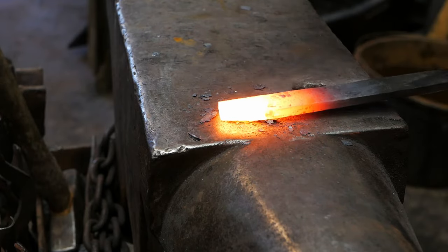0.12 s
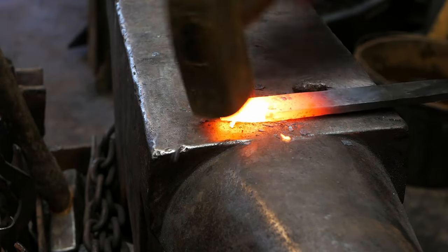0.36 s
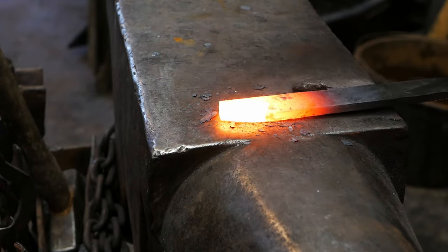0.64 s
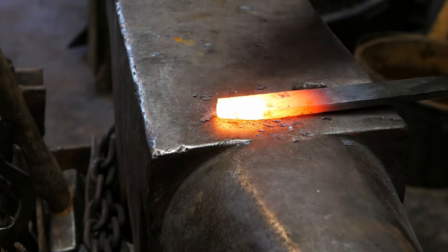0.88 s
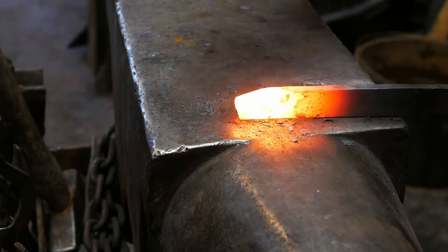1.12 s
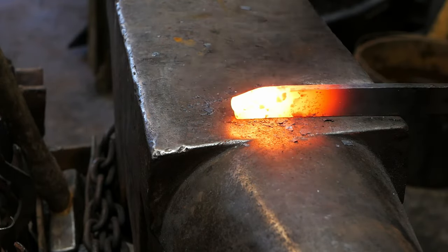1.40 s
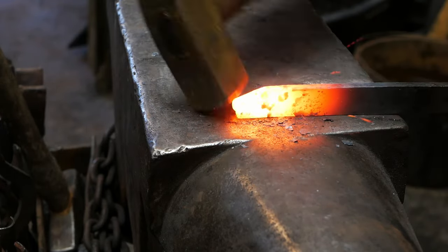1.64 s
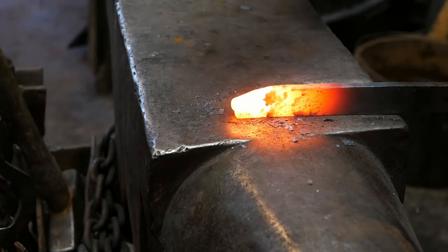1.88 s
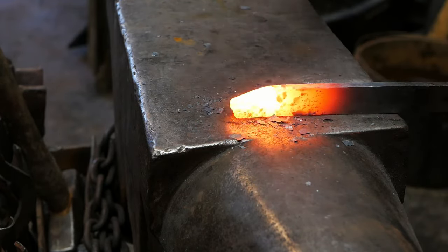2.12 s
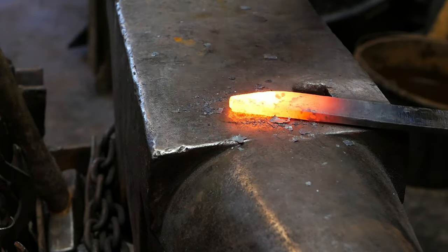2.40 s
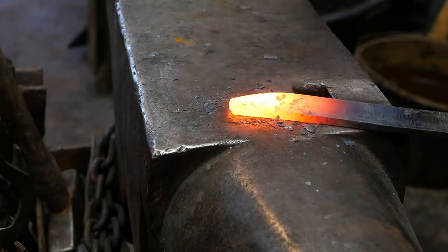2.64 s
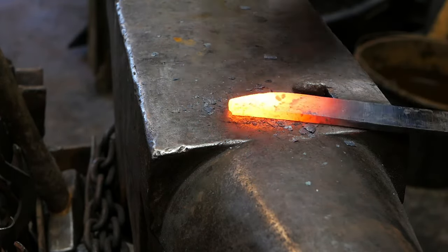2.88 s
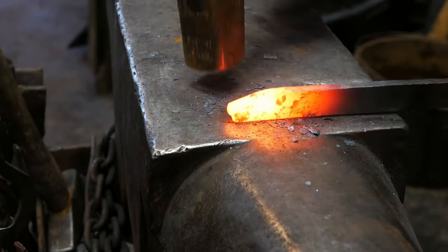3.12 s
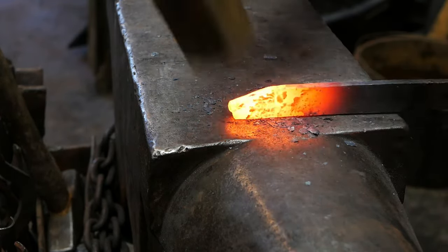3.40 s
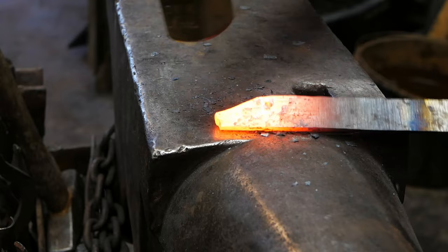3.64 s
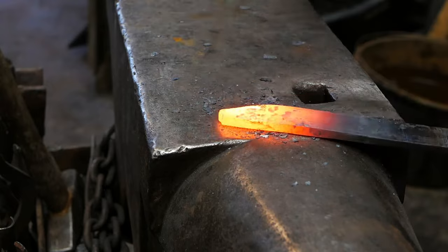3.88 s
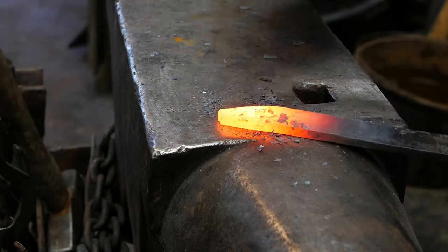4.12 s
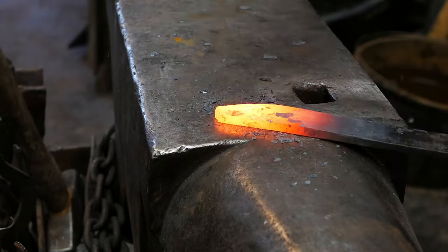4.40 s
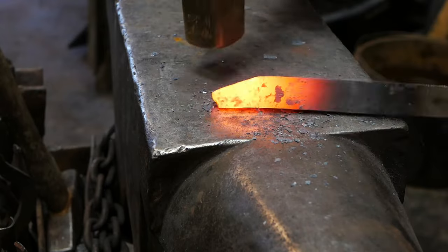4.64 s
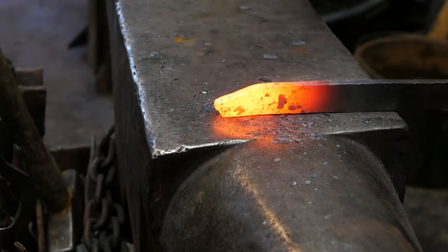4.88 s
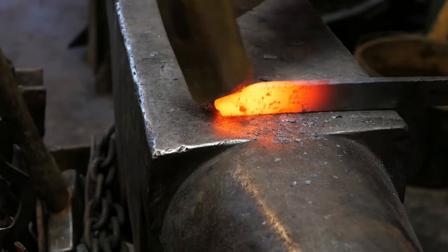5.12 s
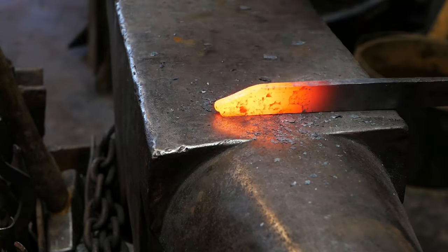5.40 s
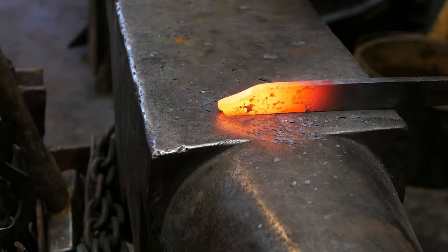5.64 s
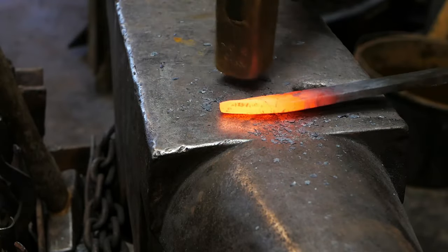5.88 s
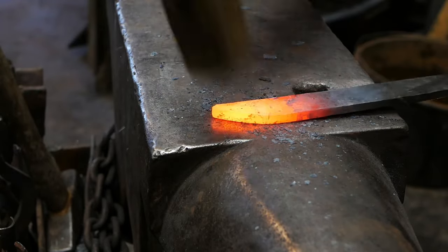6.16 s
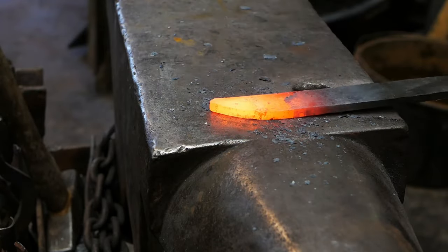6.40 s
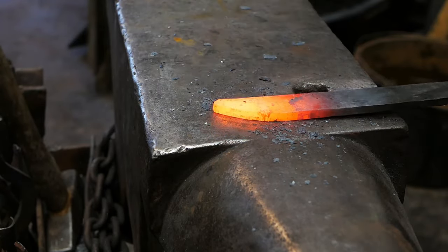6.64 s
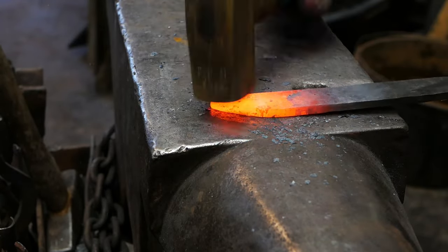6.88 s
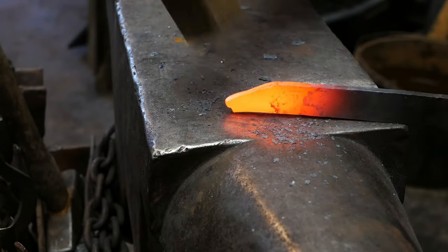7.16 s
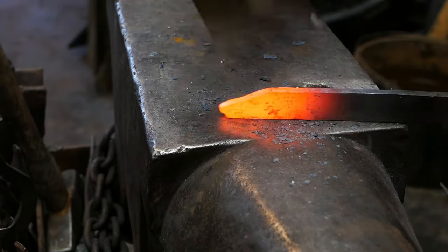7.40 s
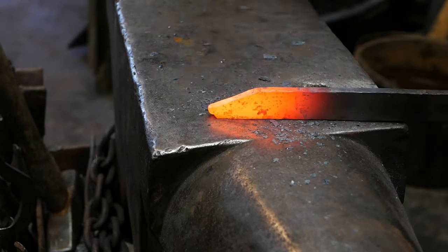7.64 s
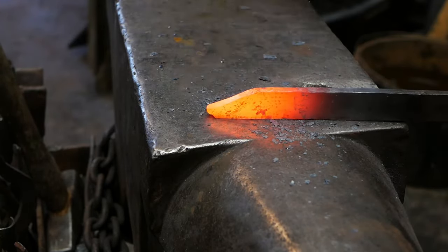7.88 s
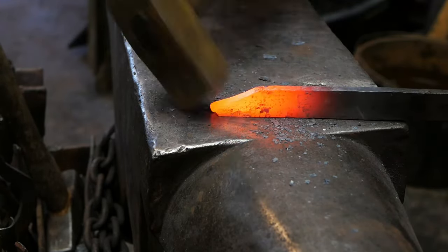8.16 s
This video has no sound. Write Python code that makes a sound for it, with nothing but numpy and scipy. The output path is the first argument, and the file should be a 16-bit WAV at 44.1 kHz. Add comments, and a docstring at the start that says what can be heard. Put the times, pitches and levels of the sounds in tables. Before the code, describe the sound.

One hard natural hammer crack, then fast smeared metallic clanks on hot iron, brief brighter anvil taps, and a faint flickering fire roar behind.

```python
"""A smith's hammer draws out a glowing iron bar on an anvil: noise cracks, room echoes and steel resonances.
Between runs of blows the hammer rests and bounces on the bare anvil, whose resonances stand out more.
A forge roars behind it, made of noise that flickers in patches.
After the first blow the sound plays several times faster at unchanged pitch: echoes shorten,
attacks smear and the two channels lose their common phase."""
import sys
import numpy as np
from scipy import signal
from scipy.fft import rfft, irfft, next_fast_len
from scipy.io import wavfile
from scipy.ndimage import uniform_filter1d

SR = 44100
rng = np.random.default_rng(int(sys.argv[2]) if len(sys.argv) > 2 else 0)


def to_linear_factor(level_db):
    """Convert decibel levels (scalar or array-like) to linear amplitude factors."""
    exponent = np.asarray(level_db, float) / 20
    return 10 ** exponent


def master_out(mix):
    """Clip the mix to full scale and print it as 16-bit PCM to the path in sys.argv[1]."""
    frames = np.transpose(np.atleast_2d(mix))
    ceiling = np.clip(frames, -1, 1)
    pcm = np.round(ceiling * 32767).astype(np.int16)
    wavfile.write(sys.argv[1], SR, pcm)


N = 364707

FAST_S, SPEED = .775, 4  # fast play starts here (s), times natural speed

# modes of anvil and hammer head: (width before damping/Hz, mean level through hot iron/dB, on bare steel/dB)
STEEL_MODES = [(90, -6, -24), (60, -10, 11), (42.1, -3, 11.5), (40, -10.5, -1.5), (60, -7.5, -27),
               (19, 3.5, -0.5), (69.4, -1, 10), (38.73, 1.5, 8.5), (58.7, -14.5, 0.5), (40, 1.5, 5.5),
               (240, -11.5, 11), (70.6, -7.5, 8), (150.6, 1.5, 13), (39.2, 6.5, 20), (104, 3, -21),
               (35, 8, 2)]
# broad spectrum of a strike: (f/Hz, relative density/dB)
STRIKE_SPECTRUM = [(47, -21), (80, -7.5), (152, -7.5), (300, -10), (1150, 1.5), (1950, -4), (2430, -2.5),
                   (3170, -9.5), (4930, -20), (6010, -30), (10400, -32.5), (14500, -58.5), (15500, -59)]
# upper edge of sustained sound: (natural speed/Hz, fast play/Hz)
TOP_EDGE_HZ = [12100, 11300]


def strikes(table, contact, column, ring_db, dulling):
    """Each strike excites the steel with a short crack, the room's answer and the hammer head's high ring."""
    usual_echo_db = -27
    out = np.zeros((2, N + SR))
    lead = SR // 20  # samples ahead of the contact
    contact_hz, contact_treble_db, contact_weight_db = np.transpose(contact)
    for s, crack_db, smear_s, echo_db, favoured_hz in table:
        natural = s < FAST_S
        size = SR // 2 if natural else SR // 3
        t = (np.arange(size) - lead) / SR
        # dulling: dB of treble lost for each dB of a heavier blow
        treble_db = along(np.c_[contact_hz, contact_treble_db], favoured_hz)
        treble_db = treble_db - dulling * (echo_db - usual_echo_db)
        weight_db = along(np.c_[contact_hz, contact_weight_db], favoured_hz)
        shape = (treble_db, favoured_hz, weight_db)
        mode_db = np.array(STEEL_MODES)[:, column] + rng.normal(0, 2, len(STEEL_MODES))

        # fast play spreads the sound ahead of the contact
        swell = np.sin(np.pi / 2 * np.clip(1 + t / np.clip(smear_s, .001, .045), 0, 1)) ** 8.1
        top = below(TOP_EDGE_HZ[not natural])
        dull = lambda hz: colour(hz, mode_db, shape, accent_db=2.5, damping=0.84) * top(hz)
        loud = np.sqrt(np.mean(np.abs(dull(np.linspace(0, SR / 2, 2048))) ** 2))

        crack = contact_crack(t, natural, mode_db, shape, crack_db - echo_db, loud)
        echo = filtered(room_echo(s, t, natural, smear_s, swell), dull)
        hit = (to_linear_factor(crack_db) * crack + to_linear_factor(echo_db) * echo) / loud
        ring = swell * head_ring(s, t, echo_db + treble_db + ring_db)
        start = round(s * SR) - lead
        out[:, start:start + size] += hit + ring
    return out[:, :N]


def contact_crack(t, natural, mode_db, shape, excess_db, loud):
    """Noise burst of the contact; while hammer and work touch, the steel is damped."""
    # crack over echo: (f/Hz, level/dB)
    edge_points = [(150, -12.5), (600, -8.5), (1500, -7.5), (3000, -8), (5000, -2), (10000, -2),
                   (13000, -9.5), (15000, 8.5), (15900, -9.5)]
    # extra thump and edge of an unsmeared crack: (f/Hz, level/dB)
    direct_points = [(300, 6.5), (700, 4.5), (1200, -7), (2500, 0), (8000, -2)]
    favoured_hz = shape[1]
    accent_db = -1.5 + 0.34 * np.clip(excess_db, 0, 14)  # a harder contact pings more

    def sharp(hz):
        balance = to_linear_factor(along(edge_points, hz) + natural * along(direct_points, hz))
        return colour(hz, mode_db, shape, accent_db, damping=2.8) * balance * (hz < 15900)

    # each slope spans 60 dB in the given seconds; fast play leaves a skirt around the crack
    core = to_linear_factor(-60 * np.abs(t) / np.where(t < 0, .003 if natural else .009, .014))
    skirt = (not natural) * to_linear_factor(-14 - 60 * np.abs(t) / np.where(t < 0, .04, .06))
    skirt_noise = filtered(skirt * noise(len(t), natural), below(TOP_EDGE_HZ[not natural]))
    push = -7 * natural * (t == 0)  # at natural speed the contact leads with one sharp pressure dip
    crack = filtered(core * noise(len(t), natural) + push + skirt_noise, sharp)

    # in fast play: brief note of the favoured range, growing 4 dB per dB of excess from 12 to 15 dB
    phase = rng.uniform(0, 2 * np.pi, (2, 1))
    ping = (not natural) * core ** 0.57 * np.sin(2 * np.pi * favoured_hz * t + phase)
    ping_gain = to_linear_factor(4 * np.clip(excess_db - 12, 0, 3) - 19.5)
    return crack + ping_gain * loud * to_linear_factor(along(STRIKE_SPECTRUM, favoured_hz) / 4) * ping


def room_echo(s, t, natural, smear_s, swell):
    """Workshop reverberation: grainy noise that decays at its own rate in each frequency range."""
    # reverberation: (f/Hz, t60 at natural speed/s)
    room_t60 = [(300, 0.45), (1000, 0.9), (2500, 0.72), (6000, 0.71), (12000, 0.5)]
    hang = 1 if natural else 1.09  # power of time in the decay: above 1 it first hangs, then drops
    size = len(t)
    hz, frame_s, z = signal.stft(noise(size, natural), SR, nperseg=256)
    age = np.maximum(clock(s + frame_s + t[0]) - clock(s), 0)
    grain = patches(z.shape[1:], depth_db=1.5, size=(4, 2))  # loudness uneven in random patches
    decay = to_linear_factor(-60 * (age / along(room_t60, hz)[:, None]) ** hang)
    echo = signal.istft(z * grain * decay, SR, nperseg=256)[1][:, :size]
    # the treble of a smeared strike sets in abruptly, ahead of the contact
    front = (1 + np.tanh((t + 0.33 * smear_s) / 0.00075)) / 2
    high = filtered(echo, lambda hz: 1 / (1 + (4500 / (hz + 1)) ** 4))
    return swell * (echo - high) + front * high


def head_ring(s, t, level_db):
    """Clean high partials of the hammer head, fading 60 dB in 55 ms of workshop time."""
    # partials of the hammer head: (f/Hz)
    partial_hz = [8210, 10143, 10660, 12390]
    # their mean relative levels: (level/dB)
    partial_db = [-2.5, 5, -11, -23]
    fade_db = -60 * np.maximum(clock(s + t) - clock(s), 0) / 0.055
    phase = rng.uniform(0, 2 * np.pi, (2, len(partial_hz), 1))
    gains = to_linear_factor(np.add(partial_db, rng.normal(0, 2.0, len(partial_hz))))[:, None]
    partials = gains * np.sin(2 * np.pi * np.outer(partial_hz, t) + phase)
    return to_linear_factor(level_db + fade_db) * partials.sum(axis=1)


def colour(hz, mode_db, shape, accent_db, damping):
    """Spectrum of a strike: the steel's resonances, and the range that the point of contact favours."""
    # mode frequencies, one for each row of STEEL_MODES: (f/Hz)
    mode_hz = [1000, 1165, 1480, 1780, 1970, 2365, 2710, 2940, 3400, 3910, 4450, 6150, 8220, 10143, 10660,
               12390]
    treble_db, accent_hz, weight_db = shape
    modes = zip(mode_hz, damping * np.array(STEEL_MODES)[:, 0], mode_db)
    bump_db = accent_db * np.exp(-(np.log((hz + 1) / accent_hz) / 0.092) ** 2)
    tilt_db = along([(1300, weight_db), (2000, 0.017), (3500, 0.022), (6000, treble_db)], hz)
    return to_linear_factor(along(STRIKE_SPECTRUM, hz) + tilt_db + bump_db) * resonances(hz, modes)


def forge():
    """Roar of fire and blower: flickering noise through the hood's resonances, with a hiss of varying level."""
    # level of the roar and its hiss over time: (t/s, roar level/dB, gain of its hiss/dB)
    roar_course = [(0.0, -41.5, 4.5), (0.41, -39, -0.5), (0.7, -43.5, -2.5), (0.95, -49, 4.5),
                   (1.5, -45, -2.5), (2.6, -48, -0.7), (3.75, -46, -3), (4.3, -50.5, 0), (5.5, -47.5, -5),
                   (6.4, -54, 3), (7.25, -50, -2.5), (8.27, -52, -3)]
    # spectrum of the roar: (f/Hz, relative density/dB)
    roar_points = [(18, -69), (30, -33), (71, -10), (144, -7.5), (182, -6), (299, -12), (467, -8),
                   (1020, -11.5), (1200, -20), (1510, -18.5), (2300, -25), (3400, -29), (8060, -46.5),
                   (9190, -44.5), (15500, -47)]
    # forge hood resonances: (f/Hz, width/Hz, level/dB)
    hood_modes = [(182, 49, -5), (452, 26, 8.5), (596, 22, 1.5)]
    t = np.arange(N) / SR
    source = np.where(t < FAST_S, noise(N, True), noise(N, False))
    z = signal.stft(source, nperseg=1024)[2]
    flicker = patches(z.shape[1:], depth_db=3.5, size=(4, 5))
    fire = signal.istft(z * flicker, nperseg=1024)[1][:, :N]
    top = below(TOP_EDGE_HZ[1])
    roar = unit(filtered(fire, lambda hz: to_linear_factor(along(roar_points, hz)) * resonances(hz, hood_modes) * top(hz)))
    hiss = filtered(roar, lambda hz: 1 / (1 + (1500 / (hz + 1)) ** 4))
    s, roar_db, hiss_db = np.transpose(roar_course)
    roar = roar + (to_linear_factor(np.interp(t, s, hiss_db)) - 1) * hiss
    return to_linear_factor(np.interp(t, s, roar_db)) * roar


def noise(n, natural):
    """Stereo noise: independent channels in fast play, partly shared at natural speed."""
    # left-right likeness at natural speed: (f/Hz, correlation)
    likeness = [(60, 0.25), (380, 0.72), (2380, 0.22), (15000, 1)]
    pair = rng.standard_normal((2, n))
    if not natural:
        return pair
    turn = lambda hz: np.arccos(np.clip(along(likeness, hz), -1, 1)) / 2
    mid, side = filtered(pair, lambda hz: np.array([np.cos(turn(hz)), np.sin(turn(hz))]))
    return np.array([mid + side, mid - side])


def clock(s):
    """Workshop time that has passed at playing time s."""
    return s + (SPEED - 1) * np.maximum(s - FAST_S, 0)


def resonances(hz, modes):
    """Causal peaks (f/Hz, width/Hz, level/dB) over a flat response."""
    return 1 + sum(to_linear_factor(db) * 1j * hz * w / (c * c - hz * hz + 1j * hz * w) for c, w, db in modes)


def below(top_hz):
    """Steep treble edge."""
    return lambda hz: 1 / (1 + (hz / top_hz) ** 40)


def patches(shape, depth_db, size):
    """Random gains, smooth over size cells of a spectrogram."""
    field = uniform_filter1d(rng.standard_normal(shape), size[0], 0)
    field = uniform_filter1d(field, size[1], 1)
    return unit(to_linear_factor(depth_db * unit(field)))


def filtered(x, response):
    """x through a complex response of frequency."""
    n = x.shape[-1]
    m = next_fast_len(n + 8192)
    return irfft(rfft(x, m) * response(np.fft.rfftfreq(m, 1 / SR)), m)[..., :n]


def along(points, hz):
    """Interpolates (f/Hz, value) points on a log frequency axis."""
    f, v = np.transpose(points)
    return np.interp(np.log(hz + 1), np.log(f + 1), v)


def unit(x):
    """Scaled to rms 1."""
    return x / np.sqrt(np.mean(x ** 2) + 1e-20)


def scene():
    """Blows, bounces and forge, slightly right of centre."""
    # hammer on hot iron: (t/s, crack level/dB, smear/s, echo level/dB, favoured f/Hz)
    blow_table = [(0.3817, -2, .0025, -29.5, 4380), (0.7992, -18.5, .038, -27.5, 2430),
                  (0.9723, -52, 0.053, -29, 2510), (1.3204, -15.5, 0.038, -29.5, 770),
                  (1.5066, -61.5, 0.044, -28.5, 700), (1.6836, -24, 0.029, -27, 2170),
                  (1.8593, -24, .008, -26, 750), (2.0506, -9.5, 0.0099, -26, 2400),
                  (2.2359, -14.5, 0.038, -29, 1080), (2.5958, -11, 0.0091, -29.5, 2830),
                  (2.7822, -30, 0.033, -26, 2500), (2.957, -20, .012, -24.5, 3520),
                  (3.4156, -9, 0.021, -26.5, 4550), (3.6068, -26.5, 0.047, -27, 1380),
                  (4.0135, -47.5, 0.062, -30.5, 5290), (4.1971, -13.5, 0.0043, -26.5, 5030),
                  (4.3772, -17.5, 0.015, -24.5, 2200), (4.5785, -37.5, 0.05, -29, 2420),
                  (4.9946, -13.5, .012, -28, 743), (5.1936, -8, 0.029, -25, 794),
                  (5.3836, -9.5, 0.017, -24, 2800), (5.5697, -24, 0.0055, -24.5, 2400),
                  (5.7611, -26, 0.0091, -26, 4080), (6.1823, -16, .012, -29.5, 4270),
                  (6.3791, -52, 0.043, -29.5, 2960), (6.571, -41, .043, -31, 4330),
                  (6.7559, -15.5, 0.01, -27, 3770), (6.9468, -40.5, 0.018, -28, 3750),
                  (7.4093, -17, 0.016, -31.5, 5600), (7.6185, -16, 0.062, -28.5, 1130),
                  (7.8106, -21, 0.057, -27, 1930), (7.996, -32, 0.032, -27, 1320),
                  (8.1964, -27, .02, -26, 2630)]
    # hammer bouncing on bare steel: (t/s, crack level/dB, smear/s, echo level/dB, favoured f/Hz)
    tap_table = [(1.0734, -11.5, 0.026, -24.5, 665), (1.1043, -20, 0.014, -30, 700),
                 (2.3501, -46, 0.063, -28, 6140), (2.3743, -28, 0.014, -31.5, 6160),
                 (2.4026, -20.5, .014, -34, 1045), (3.1363, -19.5, 0.043, -29, 2000),
                 (3.1885, -43, 0.026, -27.5, 3770), (3.2257, -17, 0.025, -33, 4040),
                 (3.7542, -33, .038, -27.5, 6100), (3.8018, -21.5, 0.06, -30.5, 2330),
                 (3.8189, -49, 0.015, -30, 1480), (4.6989, -14.5, 0.026, -27, 4450),
                 (4.7503, -14, 0.014, -32, 1305), (5.897, -18, 0.032, -28.5, 5830),
                 (5.9331, -22, 0.014, -30.5, 5850), (5.9579, -20, 0.0097, -36, 850),
                 (7.0836, -38, 0.04, -31.5, 3430), (7.1268, -23.5, .031, -32.5, 1140),
                 (7.1572, -49, 0.02, -34, 750)]
    # tilt by point of contact on iron: (favoured f/Hz, treble before dulling/dB, low weight/dB)
    iron_contact = [(750, 11.5, 4), (1200, 7, 1.5), (2400, 9, -.6), (3700, 11.5, -1.5), (5500, 12, 1.6)]
    # tilt by point of contact on steel: (favoured f/Hz, treble/dB, low weight/dB)
    steel_contact = [(700, 2.7, -4), (1230, -5.5, -5.5), (2200, 2.5, -8), (5550, 3, -7.5)]
    # a heavier blow sinks into the hot iron, which dulls it
    blows = strikes(blow_table, iron_contact, column=1, ring_db=-30.0, dulling=0.53)
    taps = strikes(tap_table, steel_contact, column=2, ring_db=-23, dulling=0)
    return (blows + taps + forge()) * to_linear_factor([[-.4], [.4]])


def roll_off(x):
    """The treble ends steeply here."""
    return signal.sosfilt(signal.butter(12, 16340, fs=SR, output="sos"), x)


def record(dry):
    """Microphone with a narrow treble notch."""
    notch = lambda hz: 1 - .8 / (1 + ((hz - 7800) / 120) ** 2)
    return roll_off(filtered(dry, notch))


dry = scene()
out = record(dry)
master_out(out)
```